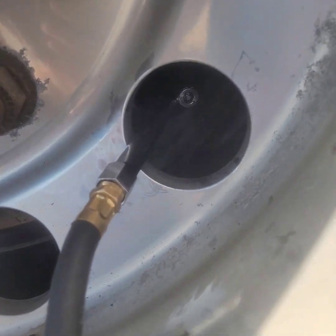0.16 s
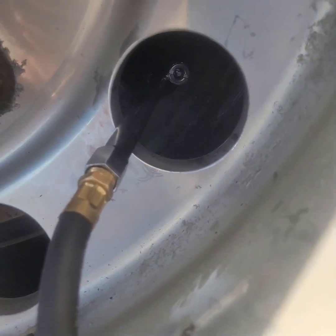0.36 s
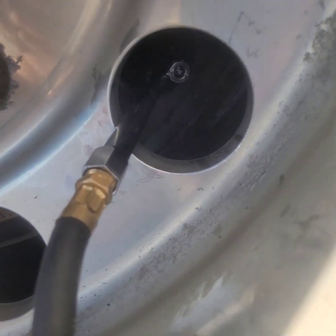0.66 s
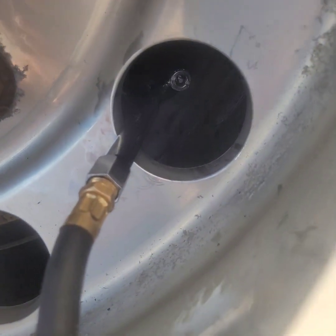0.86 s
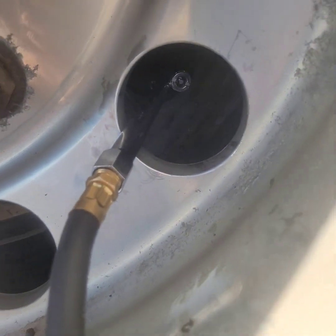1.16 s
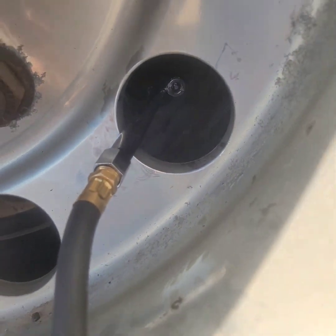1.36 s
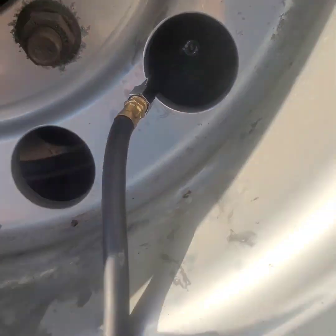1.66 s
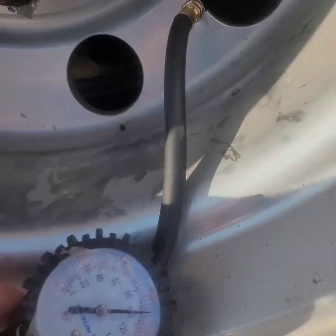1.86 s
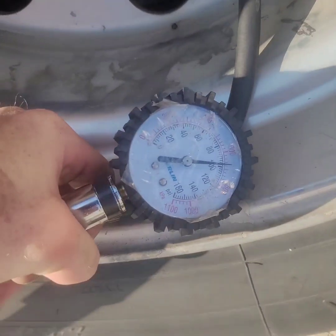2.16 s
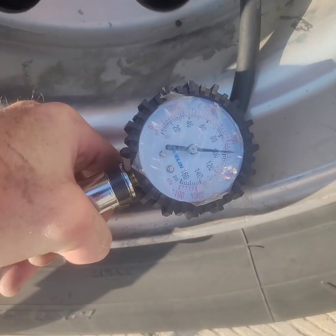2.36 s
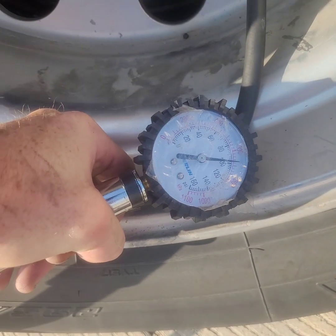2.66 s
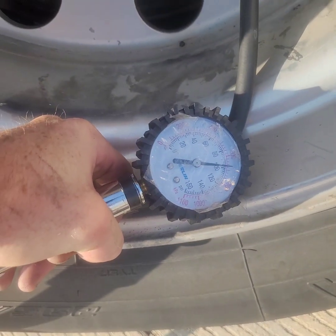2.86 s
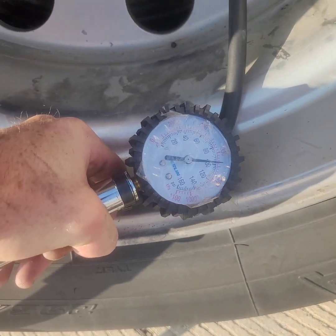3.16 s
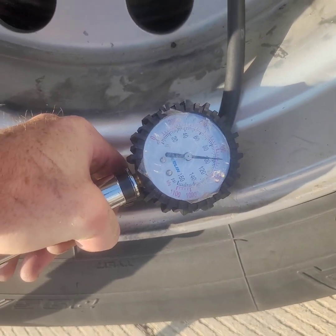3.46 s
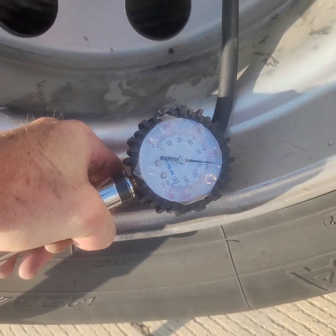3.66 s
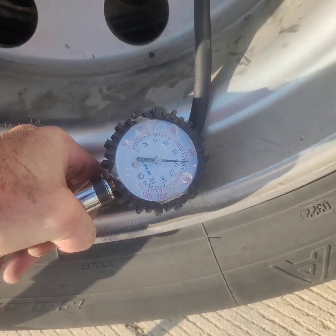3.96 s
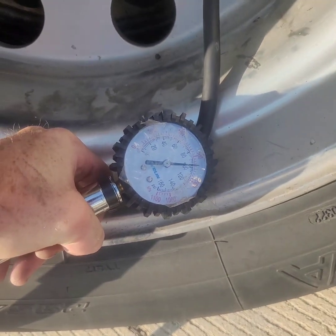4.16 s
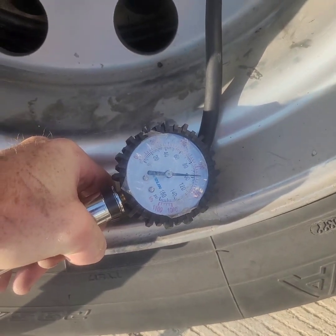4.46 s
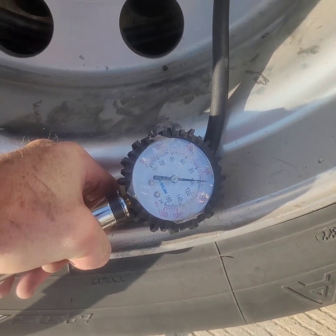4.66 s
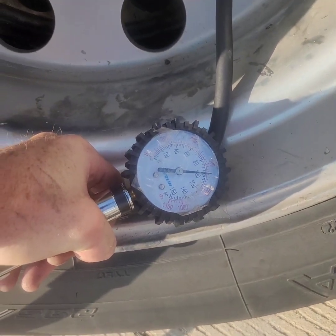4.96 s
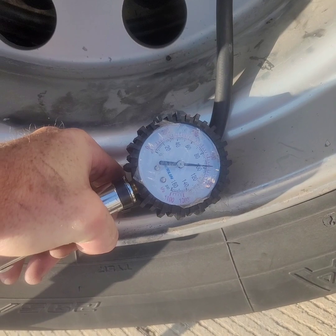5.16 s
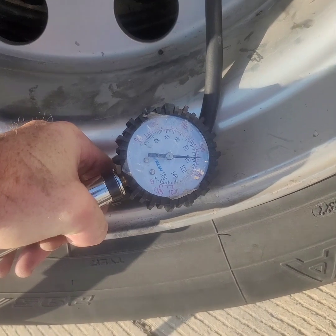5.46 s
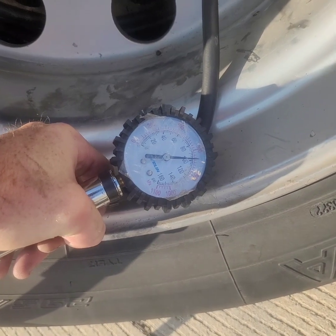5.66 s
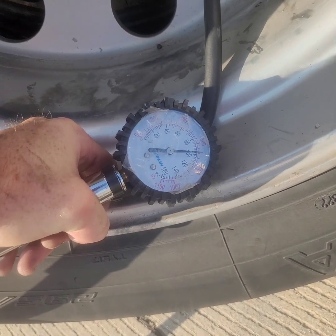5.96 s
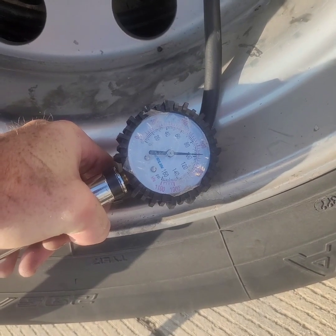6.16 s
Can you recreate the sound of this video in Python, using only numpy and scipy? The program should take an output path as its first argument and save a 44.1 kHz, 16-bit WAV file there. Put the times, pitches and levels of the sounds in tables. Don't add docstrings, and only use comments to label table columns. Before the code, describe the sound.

From 0 seconds a diesel idles close by in an open lot: a deep, even hum of rapid firings around 40 pulses per second, with a faint fan whir, exhaust rumble and grainy midrange roar. Above it compressed air hisses into a truck tire, smooth, airy and very high, without breaks. The handheld stereo microphone starts at the wheel opening, where the rumble is slightly boxier. Between about 0.1 and 1.4 seconds, wind bumps and soft low thuds buffet it, shifting from side to side, with lesser ones near 1.8 and 2.0. From 1.4 to 2.5 it swings downward and everything dips a little; around 2.7 it opens up near the gauge, the roar changing colour and the hiss gaining a subtle rim reflection at right. Faint gusts pass near 2.8, 4.0 and 5.2. Engine and hiss continue steadily until the cut at about 6.3 seconds.

```python
import sys
import numpy as np
from scipy import signal
from scipy.io import wavfile
from scipy.ndimage import uniform_filter1d, map_coordinates

SR = 44100
rng = np.random.default_rng(int(sys.argv[2]) if len(sys.argv) > 2 else 0)


def inscribe(sig):
    pcm = np.round(np.clip(np.atleast_2d(sig).T, -1, 1) * 32767)
    wavfile.write(sys.argv[1], SR, pcm.astype(np.int16))


def boost(x):
    u = np.asarray(x, float) / 20
    return 10 ** u


N = 277830

# (multiple of crank speed, level [dB rms], left-right [dB])
FIRING_ORDERS = [(2, -26, -2.2), (3.5, -39, -.6), (4, -20, -.1), (6, -35, -2.1), (7, -30, -1.5),
                 (8, -27, -1.2), (10, -34, .1), (12, -35, -.7), (18, -49, -1.5), (30, -48, .6),
                 (32, -49, -6.)]
# (multiple of blade rate, level at wheel [dB rms], level at gauge [dB rms])
FAN_TONES = [(1, -38, -40), (2, -38, -37), (3, -37, -46), (4, -48, -49)]
# (time [s], closeness to the wheel opening [0-1], left-right of the hiss [dB])
HAND_PATH = [
    (0, 0.9, 0.5),
    (1.1, 1, 1.5),
    (1.5, 0.64, -2),
    (1.9, 0.4, -1),
    (2.3, 0.4, -0.5),
    (2.8, 0.15, -0.5),
    (6.3, 0.42, -1.5),
]
# (time [s], level [dB])
PORT_SHADE = [(0, 0.4), (.6, -0.8), (1.2, -1.3), (1.45, -3.5), (1.8, -3.5), (2.5, -3), (2.7, .3),
              (3.5, -0.3), (4.1, -0.6), (4.5, -0.46), (5.5, 0), (6.3, -0.5)]
# (time [s], extra path [m])
RIM_PATH = [(2.3, .2435), (2.8, .2216), (3.2, .214), (3.9, .1777), (4.2, .1765), (4.8, .1887), (5.2, .1736),
            (6.3, .1708)]
# (time [s], level [dB], port [0 left, 1 right])
WIND_GUSTS = [(.10, -23, 0), (.244, -17, 1), (.40, -21, 0), (.57, -19, 1), (.72, -18, 1), (.823, -24, 0),
              (.905, -16, 1), (1.11, -19, 1), (1.19, -14, 1), (1.36, -13, 0), (1.623, -33, 1),
              (1.786, -20, 1), (2.002, -22, 0), (2.20, -35, 1), (2.674, -25, 1), (2.82, -23, 1),
              (3.983, -19, 1), (4.115, -37, 1), (5.16, -24, 1)]
# (time [s], peak [dB], swing [Hz], left-right [dB])
PORT_BUFFETS = [(.405, -17, 90, -3), (.551, -17, 60, -10), (.609, -10, 80, 10), (.803, -20, 80, 6),
                (.911, -14, 65, -8), (1.168, -18, 55, -10), (1.272, -15, 70, -10), (2.003, -18, 70, 8)]
# (frequency [Hz], density [dB per Hz])
RUMBLE_COLOUR = [(28, -23), (45, 0.5), (70, -2.5), (98, -7.5), (128, 1), (160, -4), (190, -8), (225, -1.5),
                 (255, -5.5), (285, -8.5), (330, -8.5), (365, -16.5), (480, -19.5), (700, -43)]
# (frequency [Hz], lift [dB])
WHEEL_LIFT = [(180, .1), (245, 3.7), (300, 0.61), (390, 6.7), (460, 1.9), (600, .1)]
# (frequency [Hz], density [dB per Hz])
ROAR_AT_WHEEL = [(260, -58), (450, -4.5), (541, -4), (596, -2.5), (643, -0.5), (910, -3), (993, -1),
                 (1190, -8.5), (1580, -11), (1760, -20), (2010, -20.5), (3000, -27.5), (6000, -41),
                 (7800, -36), (13200, -120)]
# (frequency [Hz], density [dB per Hz])
ROAR_AT_GAUGE = [(260, -7.5), (450, -13), (480, -13.5), (518, -3.5), (637, 1.5), (844, -7), (930, -1.5),
                 (1050, -10.5), (1130, -6), (1320, -8), (1480, -15.5), (1840, -12.5), (2030, -19.5),
                 (2190, -19), (6000, -37), (7800, -39), (13200, -120)]
# (frequency [Hz], density [dB per Hz])
HISS_AT_WHEEL = [(2900, -33), (4500, -12.5), (5800, -14), (7000, -10), (7700, -13), (8300, -13),
                 (9100, -15), (10200, -9.5), (11300, -7.5), (12500, -3), (13900, -8), (14800, 0),
                 (15500, 0), (16500, 1.5)]
# (frequency [Hz], density [dB per Hz])
HISS_AT_GAUGE = [(2900, -30), (5000, -33), (6400, -36), (7100, -24), (7650, -9.5), (8200, -18), (8900, -31),
                 (9500, -12), (10300, -8), (11500, -2.5), (13000, -4), (14200, -1), (15400, 1.5),
                 (16500, 2)]
# (frequency [Hz], density [dB per Hz])
WIND_COLOUR = [(25, -25), (42, 5), (70, 13.5), (130, -5), (250, -5), (420, -13), (800, -45.5)]
# (frequency [Hz], shared power [0-1])
PORT_LIKENESS = [(60, 0.79), (200, 1), (330, 0.55), (520, 0.44), (700, 0.25), (900, 0.29), (1400, 0.27),
                 (3000, 0), (15000, 0.36)]
# (frequency [Hz], lead [radians])
PORT_LEAD = [(60, 0.48), (520, 0.36), (860, 2.32), (2240, 5.97), (4570, 8.7), (15000, 11.5)]
# (frequency [Hz], left-right [dB])
LEFT_RIGHT = [(60, -1.5), (110, -1.5), (200, 0.5), (380, -2), (700, -1.5), (1290, -0.5), (2380, 0.5),
              (4400, 3), (8120, 3.5), (15000, 3.5)]

FRAME, HOP = 2048, 512
SIDES = np.array([.5, -.5])[:, None]


def columns(rows, at_s):
    s, *values = np.transpose(rows)
    return [np.interp(at_s, s, v) for v in values]


def at_hz(points, hz):
    table_hz, values = np.array(points).T
    return np.interp(np.log(hz + 1), np.log(table_hz), values)


def above(hz, corner_hz, order):
    return 1 / (1 + (corner_hz / (hz + 1)) ** order)


def drift(shape, span):
    slow = rng.standard_normal(shape)
    for _ in range(2):
        slow = uniform_filter1d(slow, max(round(span), 1), axis=-1, mode="wrap")
    return slow / slow.std()


def short_spectra(x):
    hz, s, z = signal.stft(x, SR, nperseg=FRAME, noverlap=FRAME - HOP)
    return hz[:, None], s, z


def sound(z):
    return signal.istft(z, SR, nperseg=FRAME, noverlap=FRAME - HOP)[1][..., :N]


def coloured(z, colour_db, level_db):
    gain = boost(colour_db)
    rms = np.sqrt(np.mean(gain ** 2, axis=0))
    return z * gain / rms * boost(level_db)


def patches(hz, s, depth_db, span):
    rows = drift((64, len(s)), span)
    row = np.clip(6 * np.log2((hz[:, 0] + 1) / 20), 0, 63)
    where = np.meshgrid(row, np.arange(len(s)), indexing="ij")
    return depth_db * map_coordinates(rows, where, order=1)


def wheel_closeness(at_s):
    return np.clip(columns(HAND_PATH, at_s)[0], 0, 1)


def heard(at_s, gauge_db, shade_share, wheel_lift_db):
    shade_db = columns(PORT_SHADE, at_s)[0]
    return gauge_db + shade_share * shade_db + wheel_lift_db * wheel_closeness(at_s)


def port_noise():
    hz, s, (shared, left, right) = short_spectra(rng.standard_normal((3, N)))
    sides = SIDES[:, None]
    alike = np.clip(at_hz(PORT_LIKENESS, hz), 0, 1)
    own = np.sqrt(1 - alike) * np.array([left, right])
    common = np.sqrt(alike) * shared * np.exp(1j * sides * at_hz(PORT_LEAD, hz))
    return hz, s, (common + own) * boost(sides * at_hz(LEFT_RIGHT, hz))


def firing():
    crank_hz, first_firing_s, pipe_hz = 20.813, .0165, 135
    t, out = np.arange(N) / SR, 0
    crank = 2 * np.pi * crank_hz * (t - first_firing_s) + 0.009 * drift(N, 11000)
    for multiple, level_db, pan_db in FIRING_ORDERS:
        order_hz = multiple * crank_hz
        waver_db = 0.78 * drift(N, 3800)
        lead = SIDES * at_hz(PORT_LEAD, order_hz)
        lead = lead + np.pi / 2 * (order_hz > pipe_hz)
        out = out + boost(level_db + waver_db + SIDES * pan_db) * np.cos(multiple * crank + lead)
    return np.sqrt(2) * out * boost(heard(t, .1, 0.82, -0.17))


def fan():
    blade_hz = 131.53
    t, out = np.arange(N) / SR, 0
    near = wheel_closeness(t)
    turn = 2 * np.pi * blade_hz * t + 0.14 * drift(N, 9000)
    for multiple, wheel_db, gauge_db in FAN_TONES:
        level_db = near * wheel_db + (1 - near) * gauge_db + 2.4 * drift(N, 1300)
        pan_db = 1.0 + 11.3 * near
        out = out + boost(level_db + SIDES * pan_db) * np.sin(multiple * turn)
    return np.sqrt(2) * out


def engine_noise():
    top_lift_db, sway_db = 2.2, .5
    hz, s, z = port_noise()
    near = wheel_closeness(s)
    rumble = at_hz(RUMBLE_COLOUR, hz) + near * at_hz(WHEEL_LIFT, hz)
    roar = near * at_hz(ROAR_AT_WHEEL, hz) + (1 - near) * at_hz(ROAR_AT_GAUGE, hz)
    roar = roar + patches(hz, s, 0.8, 22)
    roar = roar + (top_lift_db + sway_db * drift(len(s), 14)) * above(hz, 2200, order=4)
    rumble_db = heard(s, -22.5, 0.54, 2.5) - 0.5
    roar_db = heard(s, -32.5, 0.83, -0.46) + 5.5
    return sound(coloured(z, rumble, rumble_db) + coloured(z, roar, roar_db))


def air_hiss():
    top_lift_db, flutter_db = 0.5, 0.53
    faced_s, turn_s, before, after = 2.45, .3, .11, 0.27
    left_echo_s, left_echo = 0.437e-3, 0.045
    hz, s, z = port_noise()
    near, pan_db = columns(HAND_PATH, s)
    colour = near * at_hz(HISS_AT_WHEEL, hz) + (1 - near) * at_hz(HISS_AT_GAUGE, hz)
    colour = colour + patches(hz, s, 1.0, 30)
    colour = colour + (top_lift_db + flutter_db * drift(len(s), 7)) * above(hz, 15400, order=24)
    delay_s = columns(RIM_PATH, s)[0] / 343
    strength = before + (after - before) * np.clip((s - faced_s) / turn_s + .5, 0, 1)
    bright = above(hz, 11000, order=8)
    left = 1 + left_echo * bright * np.exp(-2j * np.pi * hz * left_echo_s) + 0 * s
    right = 1 + strength * bright * np.exp(-2j * np.pi * hz * delay_s)
    level_db = heard(s, -35, 0.58, -.5) + 6.2
    jet = coloured(z, colour, level_db) * boost(SIDES[:, None] * pan_db)
    return sound(jet * np.array([left, right]))


def wind():
    breeze_db, gust_half_s = -34, 0.063
    t = np.arange(N) / SR
    hz, s, z = short_spectra(rng.standard_normal((2, N)))
    strength = np.full((2, N), boost(breeze_db))
    for at_s, level_db, port in WIND_GUSTS:
        strength[round(port)] += boost(level_db) * np.exp(-((t - at_s) / gust_half_s) ** 2)
    lumps = boost(1.1 * drift((2, N), 970))
    return sound(coloured(z, at_hz(WIND_COLOUR, hz), 0)) * strength * lumps


def buffets():
    t, out = np.arange(N) / SR, 0
    for at_s, peak_db, swing_hz, pan_db in PORT_BUFFETS:
        turns = (t - at_s) * swing_hz
        swing = np.cos(2 * np.pi * turns) * np.exp(-(turns / 0.52) ** 2)
        out = out - boost(peak_db + SIDES * pan_db) * swing
    return out


def scene():
    return firing() + fan() + engine_noise() + air_hiss() + wind() + buffets()


def band_limit(x):
    return signal.sosfilt(signal.butter(12, 17090, fs=SR, output="sos"), x)


def record(dry):
    bass_cut_hz, treble_wall_hz = 34, 15740
    bass_cut = signal.butter(6, bass_cut_hz, "high", fs=SR, output="sos")
    hz, s, z = short_spectra(signal.sosfiltfilt(bass_cut, dry))
    mix = sound(z * (hz < treble_wall_hz))
    return band_limit(mix)


dry = scene()
out = record(dry)
inscribe(out)
```